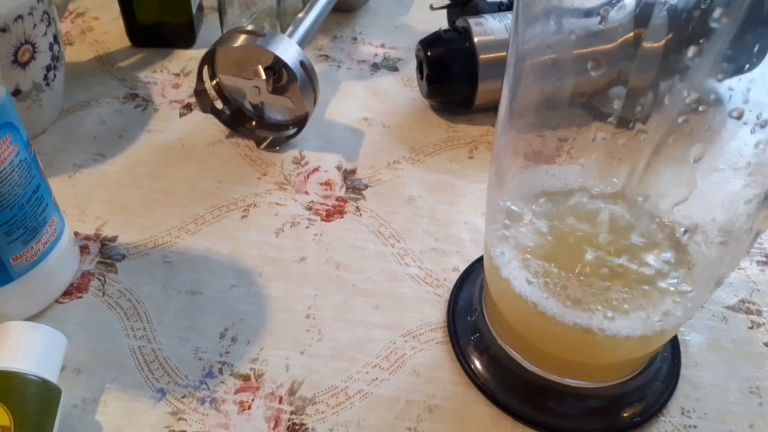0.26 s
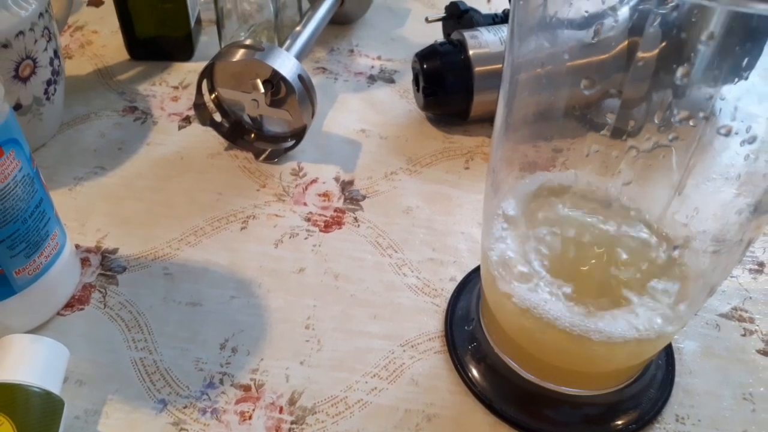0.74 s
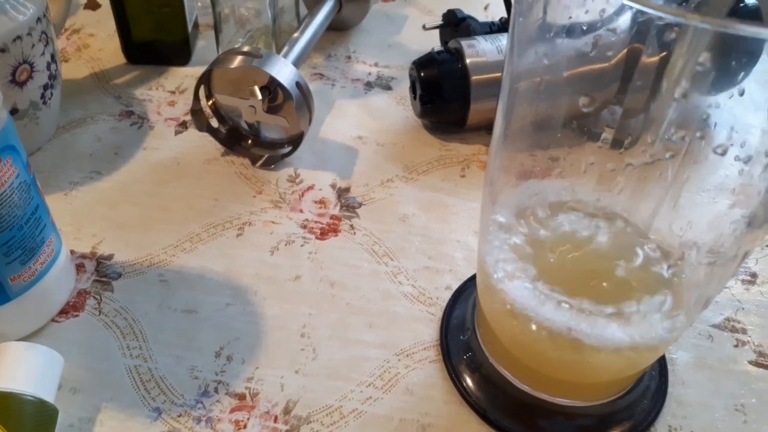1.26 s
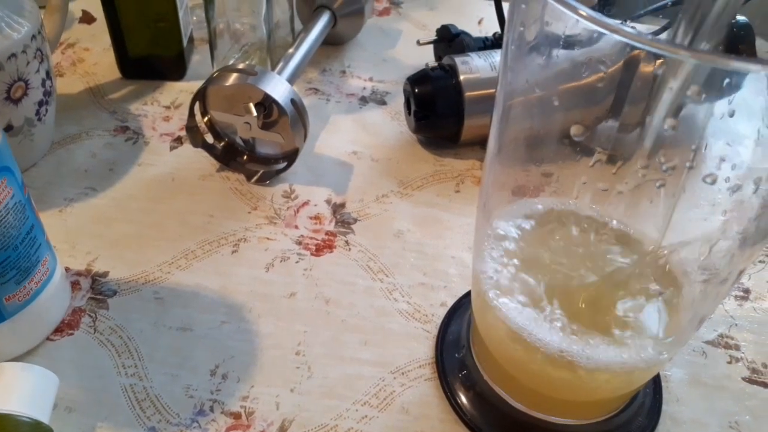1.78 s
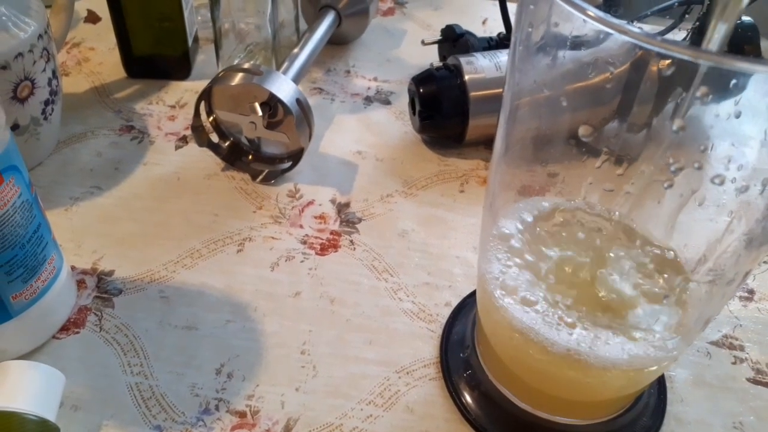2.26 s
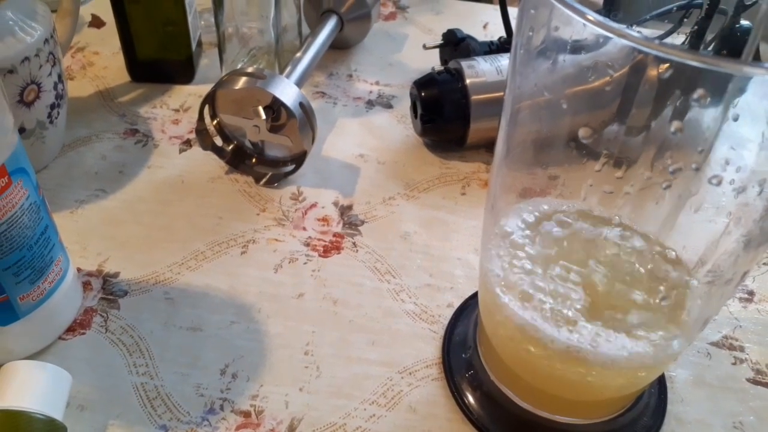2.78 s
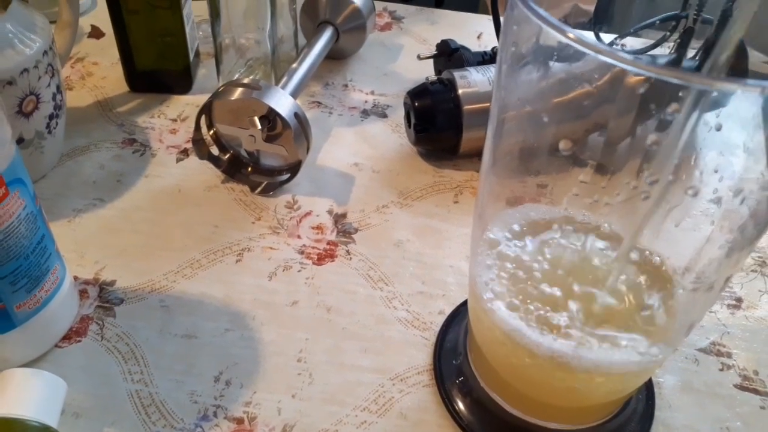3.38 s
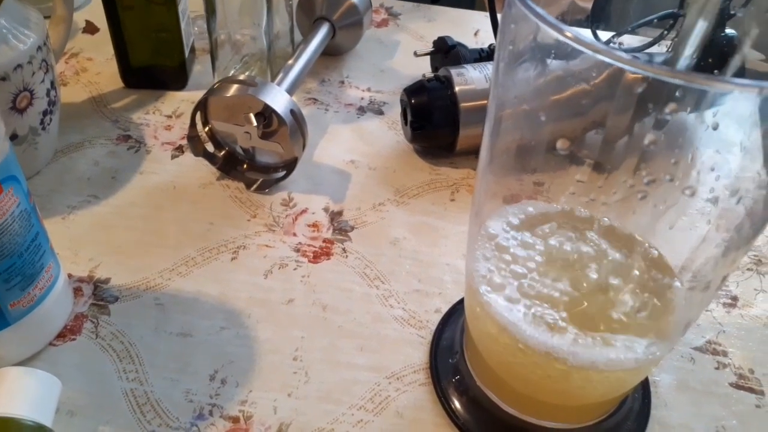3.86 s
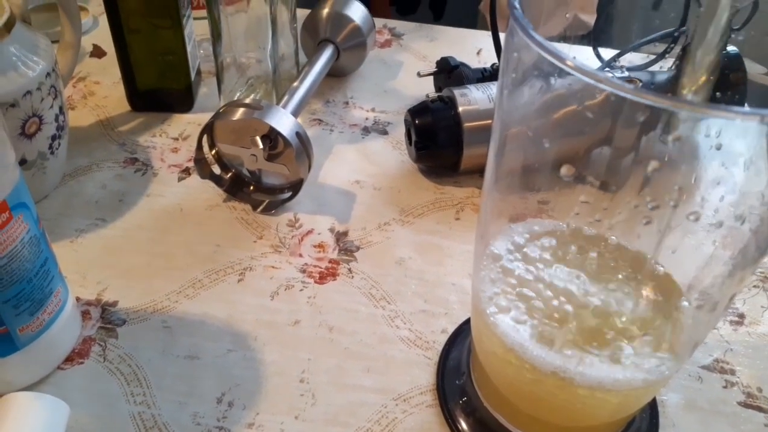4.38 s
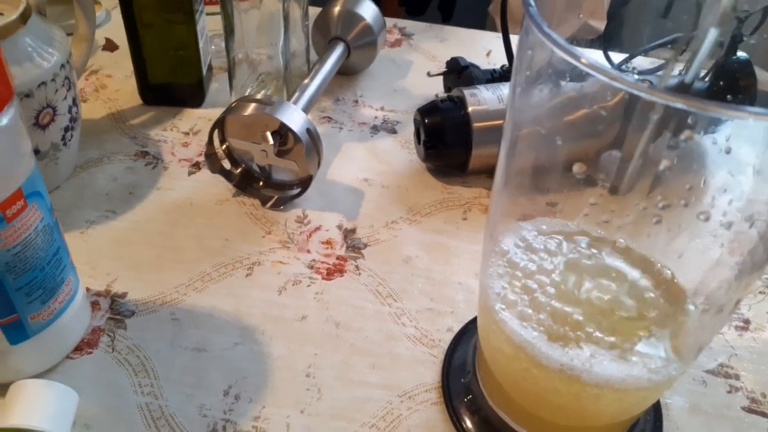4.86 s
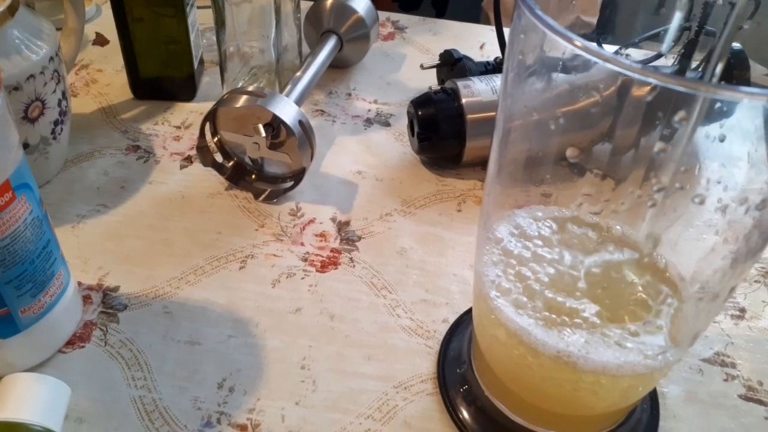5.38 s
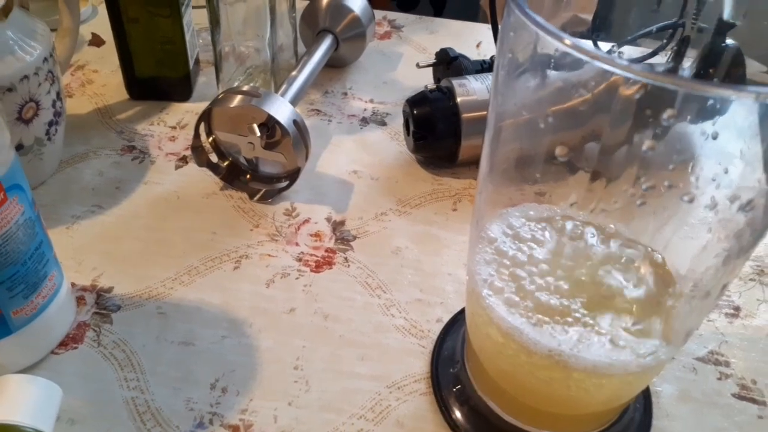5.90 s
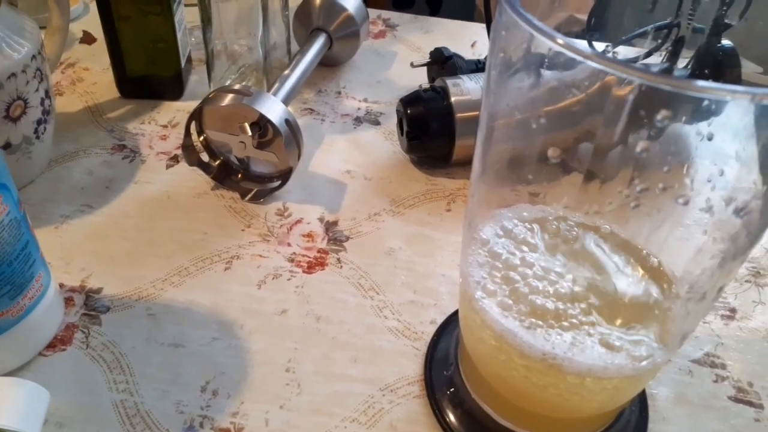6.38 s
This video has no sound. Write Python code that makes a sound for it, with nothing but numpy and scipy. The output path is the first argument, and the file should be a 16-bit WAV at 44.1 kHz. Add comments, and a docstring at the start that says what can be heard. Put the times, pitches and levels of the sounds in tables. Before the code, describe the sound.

Oil glugs rapidly from a bottle into a tall plastic beaker, with low thumps, wet slaps, froth crackle and chirping bubbles over a low hum.

```python
"""Oil poured from a glugging bottle

Oil glugs from a bottle into a tall plastic beaker of frothy liquid, close to the left microphone in a small, boomy room.
Gulps of air come about six times a second: each a damped low thump, a big bubble as a quivering sine, a burst of slap.
Trapped bubbles are rising decaying sines; froth ticks are band-passed noise snaps; stirred froth is fluttering noise.
The gulps stop and the bubbles thin out over a low noise hum; beaker, walls and room add resonances and echoes."""
import sys
import numpy as np
from scipy import signal
from scipy.fft import rfft, irfft
from scipy.io import wavfile
from scipy.ndimage import uniform_filter1d

SR = 44100
rng = np.random.default_rng(int(sys.argv[2]) if len(sys.argv) > 2 else 0)


def file_out(sig):
    """Save sig as 16-bit WAV at sys.argv[1]."""
    # one column per channel
    cols = np.atleast_2d(sig).T
    # limit, then scale
    lim = np.clip(cols, -1, 1)
    pcm = np.round(lim * 32767).astype(np.int16)
    wavfile.write(sys.argv[1], SR, pcm)


N = 292824
TIME = np.arange(N) / SR
EVENT_TIME = TIME[:SR // 8]
ROOM_TIME = TIME[:SR // 2]


def amp(db):
    """Decibels to gain."""
    return 10 ** (np.asarray(db) / 20)


def unit(x):
    """Scale to rms 1."""
    return x / np.sqrt(np.mean(x ** 2))


def curve(points, s):
    """Level in dB at time s, linear between (time [s], level [dB]) points."""
    return np.interp(s, *np.transpose(points))


def add(track, s, sound):
    """Mix a sound into a track at time s."""
    i = int(np.clip(s * SR, 0, N - 1))
    track[i:i + len(sound)] += sound[:N - i]


def noise(points, size):
    """Noise of rms 1, coloured by (frequency [Hz], level [dB]) points."""
    hz, db = np.transpose(points)
    bin_hz = np.maximum(np.arange(size // 2 + 1) * SR / size, 1)
    colour = amp(np.interp(np.log(bin_hz), np.log(hz), db))
    return unit(irfft(rfft(rng.standard_normal(size)) * colour, size))


def resonance(x, hz, width_hz):
    """Two-pole band-pass with gain 1 at its centre."""
    hz = min(hz, SR * .45)
    b, a = signal.iirpeak(hz, hz / min(width_hz, SR / 4), fs=SR)
    return signal.lfilter(b, a, x)


def walk(rate_hz):
    """Random wander, linear between normal draws at the given rate."""
    knots = np.arange(0, TIME[-1] + 1, 1 / rate_hz)
    return np.interp(TIME, knots, rng.standard_normal(len(knots)))


def fade(attack_ms, decay_ms):
    """Envelope of one event: quick rise, exponential decay."""
    ms = EVENT_TIME * 1000
    return (1 - np.exp(-ms / attack_ms)) * np.exp(-ms / decay_ms)


def sweep(pitch_hz):
    """Sine that follows a pitch track."""
    return np.sin(2 * np.pi * np.cumsum(pitch_hz) / SR)


def wobble():
    """Quick random quiver of a bubble's wall, rms 1."""
    once = uniform_filter1d(rng.standard_normal(len(EVENT_TIME)), size=48)
    return unit(uniform_filter1d(once, size=48))


def bubble(hz, decay_ms, rise_octaves, quiver_octaves):
    """Air pocket rings; pitch quivers and climbs ever faster nearing the surface, by rise_octaves in 20 ms."""
    age = np.minimum(EVENT_TIME / .02, 1.4)  # the climb stops at 28 ms
    pitch_hz = hz * 2 ** (rise_octaves * age ** 2 + quiver_octaves * wobble())
    cycle_ms = 1000 / hz
    return fade(cycle_ms, decay_ms) * sweep(pitch_hz)


def thump(hz, attack_ms, decay_ms):
    """Heavily damped low swing."""
    return fade(attack_ms, decay_ms) * np.sin(2 * np.pi * hz * EVENT_TIME)


def grit(points, spread_db, envelope):
    """Coloured noise in millisecond grains of uneven size; keeps the envelope's energy."""
    size = len(EVENT_TIME)
    steps = np.repeat(amp(spread_db * rng.standard_normal(size)), 40)
    grains = uniform_filter1d(steps, size=20)[:size]
    burst = noise(points, size) * grains * envelope
    return burst * np.linalg.norm(envelope) / np.linalg.norm(burst)


# hum colour: (frequency [Hz], relative level [dB])
HUM_COLOUR = [(30, -9), (60, -20.5), (110, -8.5), (165, -11.5), (190, 3.5), (212, -8), (248, 4.5),
              (270, -3), (315, 2.5), (385, -2), (430, -14), (600, -20), (1500, -41.5)]
# hum level before channel gains: (time [s], level [dB])
HUM_SWELL = [(0, -56.5), (1.1, -47.5), (2.9, -50.5), (4.9, -49.5), (5.35, -55.5), (6.2, -48.5),
             (6.52, -56.5), (6.64, -48.5)]
# room and microphone hiss colour: (frequency [Hz], relative level [dB])
HISS_COLOUR = [(30, -37), (100, -6.5), (300, -4), (700, -13.5), (1100, -11.5), (2000, -16), (4000, -16.5),
               (7000, -21), (8500, -18.5), (15500, -19.5)]


def background():
    """Wavering low hum, mostly left, over steady hiss with a faint narrow high band on the left."""
    waver_db = 2 * walk(rate_hz=7)
    swell = amp(curve(HUM_SWELL, TIME) + waver_db)
    hum = np.array([amp(db) * swell * noise(HUM_COLOUR, N) for db in (7.5, -13)])
    hiss = np.array([amp(db) * noise(HISS_COLOUR, N) for db in (-61, -62)])
    whistle = unit(resonance(rng.standard_normal(N), hz=7350, width_hz=450))
    hiss[0] += amp(-69) * whistle
    return hum + hiss


# froth wash strength: (time [s], relative level [dB])
WASH_STRENGTH = [(0, -3.5), (2.2, -0.5), (2.8, -3.5), (4.9, -6), (5.3, 3), (6.1, -4), (6.64, -4)]
# froth wash colour: (frequency [Hz], relative level [dB])
WASH_COLOUR = [(300, -5.5), (700, -11.5), (1100, 3), (1700, 10), (3000, -3.5), (6000, -0.5), (12000, -11)]


def froth_wash():
    """Stirred froth seethes: a soft noise wash with random flutter, lasting past the pour."""
    flutter_db = 3.5 * walk(rate_hz=25) + 4 * walk(rate_hz=170)
    return amp(curve(WASH_STRENGTH, TIME) - 64.0 + flutter_db) * noise(WASH_COLOUR, N)


# bottle gulps: (time [s], relative thump level [dB], big bubble pitch [Hz], its relative level [dB],
# relative beaker gurgle level [dB])
GULPS = [(0.001, -24, 924, -32.5, -24), (0.179, -12.5, 599, -11, -15.5), (0.358, -21, 534, -31.5, -24),
         (0.534, -15, 688, -17, -16), (0.702, -19.5, 741, -27.5, -27), (0.879, -15, 607, -9, -14.5),
         (1.057, -23.5, 670, -27.5, -30), (1.226, -20.5, 844, -24.5, -16), (1.3995, -19, 741, -28.5, -16),
         (1.566, -19.5, 617, -25.5, -28.5), (1.736, -15, 656, -17, -13.5), (1.9061, -15, 659, -13, -11.5),
         (2.078, -9.5, 543, -5.5, -19), (2.246, -23, 603, -18.5, -27), (2.424, -24, 708, -23, -25),
         (2.602, -25, 673, -19.5, -18), (2.779, -20.5, 613, -19.5, -26.5), (2.955, -32, 690, -30, -34),
         (3.127, -22.5, 544, -18.5, -57), (3.303, -31, 546, -22.5, -38), (3.479, -25, 631, -20.5, -50),
         (3.652, -29, 666, -18.5, -20), (3.83, -19.5, 906, -17, -18.5), (3.847, -23.5, 760, -24, -46),
         (4.004, -20.5, 648, -17, -46), (4.176, -25.5, 731, -19.5, -18.5), (4.357, -32, 860, -65, -21.5),
         (4.864, -25.5, 877, -33.5, -42), (5.012, -30, 766, -32, -49)]
# beaker air modes rung by each slug: (frequency [Hz], relative level [dB], decay time [ms])
BEAKER_AIR = [(800, -5.5, 9.3), (1071, -8.5, 17), (1171, -7.5, 24), (1256, -6, 4.8), (1717, 3, 2.3)]
# oil slapping the surface, colour: (frequency [Hz], relative level [dB])
SPLASH_COLOUR = [(200, -38), (700, -8), (1600, 7.5), (2800, 10.5), (4500, 8.5), (7500, 3.5), (10000, -10),
                 (16000, -2.5)]
# splash with each gulp: (time [s], relative level [dB])
SPLASH_STRENGTH = [(0, -39.5), (.2, -49.5), (1.9, -37), (2.45, -55.5), (2.78, -55), (3.1, -69), (3.5, -45),
                   (4.35, -53.5), (4.86, -39.5), (5.02, -56)]
SLAP_MS, SPATTER_MS, SPATTER_DB = 1.9, 19.8, -3  # decay times; spatter level relative to slap


def glugs():
    """Air breaks into the bottle: thump and big ringing bubble; the oil slaps down and rings the beaker."""
    out = np.zeros(N)
    body = signal.butter(2, [80, 480], "band", fs=SR, output="sos")
    for s, thump_db, hz, ring_db, gurgle_db in GULPS:
        # higher ring, slightly higher thump
        thump_hz = 230 * (hz / 640) ** 0.04
        pulse = signal.sosfilt(body, thump(thump_hz, attack_ms=3.1, decay_ms=2.77))
        add(out, s, amp(thump_db + 4.0) * pulse)
        ring = bubble(hz, decay_ms=6.43, rise_octaves=0.033, quiver_octaves=0.082)
        add(out, s, amp(ring_db - 3.0) * ring)
        for mode_hz, db, decay_ms in BEAKER_AIR:
            # every slug lands elsewhere and favours other modes
            strength_db = gurgle_db + db - 12.0 + 2 * rng.standard_normal()
            mode = bubble(mode_hz, decay_ms, rise_octaves=0, quiver_octaves=0.063)
            add(out, s, amp(strength_db) * mode)
        splash_db = curve(SPLASH_STRENGTH, s) + 9.5
        slap = grit(SPLASH_COLOUR, spread_db=3, envelope=fade(0.22, SLAP_MS))
        spatter = grit(SPLASH_COLOUR, spread_db=7.5, envelope=fade(0.59, SPATTER_MS))
        add(out, s, amp(splash_db) * (slap + amp(SPATTER_DB) * spatter))
    return out


def fizz(count_per_gulp=18):
    """Each slug of oil lands and leaves a trail of faint little bubbles, following the froth wash strength."""
    out = np.zeros(N)
    for gulp_s, *_ in GULPS:
        for late, size, loud, climb in rng.random((count_per_gulp, 4)):
            s = gulp_s + .18 * late ** 1.8
            hz = 720 * 7 ** size
            db = curve(WASH_STRENGTH, s) - 46 + 12 * loud ** 2 - 7 * late
            pop = bubble(hz, decay_ms=5500 / hz, rise_octaves=0.56 * climb, quiver_octaves=0.024)
            add(out, s, amp(db) * pop)
    return out


# finest spray colour: (frequency [Hz], relative level [dB])
SPRAY_COLOUR = [(150, 7), (700, -5.5), (2000, 0), (5000, -13), (8000, -0.5), (10000, -11), (12500, 0.5),
                (15500, -3)]
SNAP_WIDTH_HZ = 2030  # of each of two band-passes in series
CRACK_MS, DROPLETS_MS, DROPLETS_DB = 1.55, 6.8, -6.5  # decay times; droplet level relative to crack


def tick(hz, snap_db, spray_db):
    """A froth film snaps with a sharp crack and throws a brief, uneven spray of droplets."""
    size = len(EVENT_TIME)
    narrowed = resonance(rng.standard_normal(size), hz, SNAP_WIDTH_HZ)
    snap = unit(resonance(narrowed, hz, SNAP_WIDTH_HZ)) * fade(attack_ms=0.078, decay_ms=3.26)
    crack = noise(SPRAY_COLOUR, size) * fade(attack_ms=0.45, decay_ms=CRACK_MS)
    droplets = grit(SPRAY_COLOUR, spread_db=11.0, envelope=fade(0.99, DROPLETS_MS))
    spray = crack + amp(DROPLETS_DB) * droplets
    return amp(snap_db) * snap + amp(spray_db + 8) * spray


# loudest froth snaps and wall spatter: (time [s], snap pitch [Hz], snap level [dB], relative spray level [dB])
SNAPS = [(0.0034, 6460, -33, -37.5), (0.177, 7500, -62, -44), (0.4942, 6450, -38, -72),
         (0.8782, 6400, -37.5, -41), (0.9908, 5700, -28.5, -63), (1.0559, 6500, -25, -46),
         (1.2264, 5800, -25, -57), (1.4, 6500, -24.5, -37.5), (1.5664, 6480, -19, -35),
         (1.7399, 4700, -33, -37.5), (1.9082, 7600, -24.5, -34.5), (2.0777, 7000, -28.5, -33.5),
         (2.2453, 5900, -39, -42.5), (2.4256, 11100, -30, -27), (2.604, 13800, -26, -25),
         (2.717, 6200, -29.5, -48), (2.82, 4670, -39.5, -44), (3.0556, 5030, -46, -45.5),
         (3.3518, 5140, -34.5, -42.5), (3.6089, 9100, -63, -46), (3.6688, 5340, -19.5, -34.5),
         (3.8487, 5100, -30, -40.5), (3.93, 7200, -39, -52), (4.0298, 6140, -27.5, -45),
         (4.128, 6430, -36, -44), (4.435, 13600, -33, -41), (4.4847, 6330, -27.5, -41),
         (4.5326, 5160, -31, -36.5), (4.6045, 5170, -29, -44), (4.803, 5860, -37.5, -50),
         (4.8635, 6100, -27.5, -45), (4.9686, 6300, -34.5, -40), (5.132, 4840, -37, -37),
         (5.47, 5760, -33, -66), (5.9094, 4800, -34.5, -45.5)]
FROTH_HZ, FROTH_SNAP_DB, FROTH_SPRAY_DB = 6300, -49, -59  # faint snaps: mid pitch, tick levels
FROTH_RANGE_DB = 2.5


def ticks(faint_count=36):
    """Loud froth snaps, and faint ones at random for as long as the bottle gulps."""
    out = np.zeros(N)
    for s, hz, snap_db, spray_db in SNAPS:
        add(out, s, tick(hz, snap_db, spray_db))
    last_gulp_s = GULPS[-1][0]
    for k, (late, weak, size) in enumerate(rng.random((faint_count, 3))):
        s = last_gulp_s * (k + late) / faint_count
        snap = tick(FROTH_HZ * 2 ** (size - .5), FROTH_SNAP_DB, FROTH_SPRAY_DB)
        add(out, s, amp(-FROTH_RANGE_DB * weak) * snap)
    return out


# loudest trapped bubbles: (time [s], pitch [Hz], relative level [dB], decay time [ms])
TRAPPED_BUBBLES = [(0.013, 1500, -19.5, 3.4), (0.0117, 3054, -18.5, 4.8), (0.3627, 1475, -27, 5.3),
                   (0.5912, 2660, -30.5, 4.1), (0.593, 3760, -28, 2.1), (0.7099, 3650, -13, 0.45),
                   (0.7397, 3840, -27.5, 3.2), (0.9157, 2530, -27.5, 0.99), (1.2293, 3480, -23, 3),
                   (1.2395, 1798, -28, 9), (1.616, 2330, -31.5, 3.4), (1.7422, 2600, -14, 1.26),
                   (2.3232, 2130, -9.5, 0.67), (2.3436, 2950, -30, 4.3), (2.3782, 3320, -23, 1.2),
                   (2.5056, 1596, -17.5, 5.6), (2.55, 1440, -24, 3.2), (2.551, 2660, -34.5, 8.2),
                   (2.65, 2430, -23.5, 5), (2.65, 1490, -30.5, 3.8), (2.7368, 2870, -26.5, 4.9),
                   (2.7825, 2890, -28, 5.1), (2.883, 350, -28.5, 4.4), (2.981, 1676, -34, 4.2),
                   (3.0253, 3330, -11.5, 0.25), (3.0685, 3060, -35, 4.5), (3.1355, 2095, -32, 14),
                   (3.316, 3235, -25, 8.6), (3.3224, 1683, -25.5, 11), (3.3524, 2205, -10, 3),
                   (3.4853, 2010, -22.5, 12.7), (3.5273, 1913, -21.5, 3.5), (3.6669, 2130, -28.5, 13),
                   (3.692, 1720, -21, 4.2), (3.6915, 2124, -18, 5), (3.7426, 1690, -33, 8.5),
                   (3.828, 1710, -12, 0.64), (3.847, 1700, -32.5, 14), (3.8477, 5040, -18, 1.6),
                   (3.9013, 1500, -26.5, 6.7), (4.03, 1522, -16.5, 6.4), (4.037, 1795, -21.5, 6.6),
                   (4.1085, 1656, -28.5, 4.1), (4.1255, 3230, -37.5, 4.7), (4.176, 1520, -27, 12.5),
                   (4.291, 3110, -37.5, 3), (4.583, 1563, -29, 9.6), (4.6207, 3390, -13, 1.86),
                   (4.6387, 1650, -15.5, 0.63), (4.6827, 1475, -22.5, 6.5), (4.8637, 3100, -19, 1.4),
                   (4.9378, 3270, -19, 1.4), (4.946, 2460, -37.5, 29), (4.9681, 1585, -17.5, 5.3),
                   (5.058, 700, -34, 2.9), (5.1338, 3800, -11, 1.5), (5.14, 2276, -32, 8.3),
                   (5.172, 760, -40, 3.7), (5.337, 1480, -28.5, 4.3), (5.471, 4430, -30.5, 1.1),
                   (5.486, 930, -33, 2), (5.6868, 3020, -29, 0.7), (5.707, 1876, -34.5, 31.5),
                   (6.0157, 3160, -36.5, 1.9), (6.11, 3510, -42, 2.1)]
RISE_OCTAVES, RISE_DECAY_MS = 0.213, 4.88  # climb in 20 ms at this decay; shorter-lived climb faster


def bubbles():
    """Plunging oil traps air pockets that chirp; each sheds three fainter ones."""
    out = np.zeros(N)
    for s, hz, db, decay_ms in TRAPPED_BUBBLES:
        rise_octaves = RISE_OCTAVES * RISE_DECAY_MS / decay_ms
        add(out, s, amp(db) * bubble(hz, decay_ms, rise_octaves, quiver_octaves=0.054))
        for late, smaller, climb in rng.random((3, 3)):
            satellite_hz = hz * 1.69 ** (smaller - .25)
            satellite = bubble(satellite_hz, 1.22, rise_octaves=0.33 * climb, quiver_octaves=0.082)
            add(out, s + .002 + 0.036 * late, amp(db - 10 - 10 * late) * satellite)
    return out


# loudest small stream bubbles: (time [s], level [dB])
BURBLE_STRENGTH = [(0, -47), (2.1, -46), (2.55, -29.5), (3.1, -49), (3.7, -29.5), (4.35, -41), (4.7, -33.5),
                   (5.05, -35.5), (5.35, -48)]
BURBLE_LOW_HZ, BURBLE_OCTAVES, BURBLE_RANGE_DB = 809.5, 2.3, 19.5
BURBLE_CYCLES = 7.7  # decay time in periods


def burble(count=220):
    """The stream drags small bubbles under; decay spans the same number of cycles at every pitch."""
    out = np.zeros(N)
    end_s = BURBLE_STRENGTH[-1][0]
    for k, (late, size, weak, climb) in enumerate(rng.random((count, 4))):
        s = end_s * (k + late) / count
        hz = BURBLE_LOW_HZ * 2 ** (BURBLE_OCTAVES * size)
        db = curve(BURBLE_STRENGTH, s) - BURBLE_RANGE_DB * weak
        decay_ms = BURBLE_CYCLES * 1000 / hz
        add(out, s, amp(db) * bubble(hz, decay_ms, rise_octaves=0.63 * climb, quiver_octaves=.16))
    return out


# air pockets squeezed shut by the oil: (time [s], first pitch [Hz], level [dB])
CLOSING_POCKETS = [(0.542, 1495, -36.5), (0.710, 1400, -23.5), (0.722, 1997, -30.5), (1.07, 1220, -36),
                   (1.157, 2860, -41), (1.243, 1190, -33.5), (1.328, 2450, -45), (2.088, 980, -37.5),
                   (2.403, 1450, -33), (2.42, 2287, -31), (2.708, 2930, -34.5), (2.939, 1016, -48),
                   (3.233, 567, -48), (3.625, 920, -45), (3.771, 810, -50), (4.603, 1520, -28),
                   (5.296, 2540, -42)]
SWOOP_CYCLES, SWOOP_OCTAVES = 39, 0.77  # length in periods of the first pitch; height of the sweep


def swoops():
    """A shrinking pocket swells in and glides up, slowly at first; small pockets close sooner."""
    out = np.zeros(N)
    for s, hz, db in CLOSING_POCKETS:
        age = np.minimum(EVENT_TIME * hz / SWOOP_CYCLES, 1)
        pitch_hz = hz * 2 ** (SWOOP_OCTAVES * age ** 1.61 + 0.03 * wobble())
        swell = np.sin(np.pi * age ** 0.55)
        add(out, s, amp(db) * swell * sweep(pitch_hz))
    return out


# soft low bumps: (time [s], frequency [Hz], level [dB])
LOW_BUMPS = [(4.675, 153, -38.5), (5.481, 112.5, -38.5), (6.558, 153, -46.5)]


def bumps():
    """Soft low bumps, gurgle or knock: slow, damped swings."""
    out = np.zeros(N)
    for s, hz, db in LOW_BUMPS:
        add(out, s, amp(db) * thump(hz, attack_ms=21, decay_ms=34))
    return out


def ringing(modes):
    """Impulse response of (frequency [Hz], gain [dB], t60 [s]) modes: decaying cosines."""
    out = np.zeros(len(ROOM_TIME))
    for hz, db, t60_s in modes:
        damping = np.log(1000) / t60_s
        decay = np.exp(-damping * ROOM_TIME)
        out += amp(db) * 2 * damping / SR * decay * np.cos(2 * np.pi * hz * ROOM_TIME)
    return out


# beaker cross modes, colouring all sound that leaves it: (frequency [Hz], relative gain [dB])
BEAKER_CROSS_MODES = [(1518, -7), (1756, 1), (1928, -15), (2065, -9), (2147, -19), (2360, 4), (2950, 1),
                      (3450, 6)]
CROSS_T60_S = 0.073


def beaker_mouth(x):
    """Sound leaves the beaker partly straight, partly ringing between its walls."""
    ring = ringing([(hz, db, CROSS_T60_S) for hz, db in BEAKER_CROSS_MODES])
    return x + amp(-5.5) * signal.fftconvolve(x, ring)[:N]


# bass echoes off the nearest walls: (delay [s], level [dB])
NEAR_WALLS = [(.0200, -5), (0.0364, -0.5)]


def bass_echoes(x):
    """The lows come back from the nearest walls."""
    bass = signal.sosfilt(signal.butter(1, 480, fs=SR, output="sos"), x)
    out = np.zeros(N)
    for delay_s, db in NEAR_WALLS:
        add(out, delay_s, amp(db) * bass)
    return out


# room standing waves: (frequency [Hz], gain [dB], t60 [s])
STANDING_WAVES = [(100.8, 16.5, 0.13), (139.2, 22, 0.37), (180.2, 1.5, 0.24), (193.1, 18, 0.54),
                  (250.7, 21.5, 0.29), (283, 9, 0.21), (312.5, 9.5, 0.11), (323, -8, 0.18),
                  (335.5, 21.5, 0.3), (343, 15, 0.21), (594, 6.5, 0.59), (642, 5, 0.063), (757, -1, 0.15),
                  (866, 3, 0.39), (1213, -30.5, 0.66)]


def room_boom(x):
    """Standing waves of the room ring on at their own pitches."""
    return signal.fftconvolve(x, ringing(STANDING_WAVES))[:N]


# scattered reflections, colour: (frequency [Hz], relative level [dB])
REFLECTION_COLOUR = [(100, -5), (330, 22.5), (460, -15), (620, 12), (1200, -4), (2000, 2), (4000, -4),
                     (8000, 0.5), (16000, 0)]


def reflections(x, t60_s=0.22, wall_s=0.0476, wall_db=-2):
    """Scattered echoes of the small room as decaying noise, with a stronger cluster from the far wall."""
    onset = np.clip((ROOM_TIME - .002) / .004, 0, 1)
    decay = amp(-60 * ROOM_TIME / t60_s) * onset
    wall = 1 + amp(wall_db) * np.exp(-((ROOM_TIME - wall_s) / 0.0014) ** 2)
    tail = noise(REFLECTION_COLOUR, len(ROOM_TIME)) * decay * wall
    return signal.fftconvolve(x, tail / np.linalg.norm(tail))[:N]


def scene():
    """The pour in the room; the right microphone is shaded and picks up little."""
    gulping = glugs() + fizz()
    small_air = amp(1.3) * bubbles() + burble() + swoops()
    pour = beaker_mouth(froth_wash() + gulping + ticks() + small_air) + bumps()
    near = pour + bass_echoes(pour) + room_boom(pour)
    left = near + amp(-3.0) * reflections(pour)
    right = amp(-41.5) * near + amp(-30.5) * reflections(pour)
    return np.array([left, right]) + background()


def record(dry):
    """Thin the deep bass below 60 Hz and cut the top above 15.6 kHz."""
    thin = signal.sosfilt(signal.butter(2, 60, "high", fs=SR, output="sos"), dry)
    return signal.sosfilt(signal.ellip(8, .2, 80, 15600, fs=SR, output="sos"), thin)


dry = scene()
out = record(dry)
file_out(out)
```